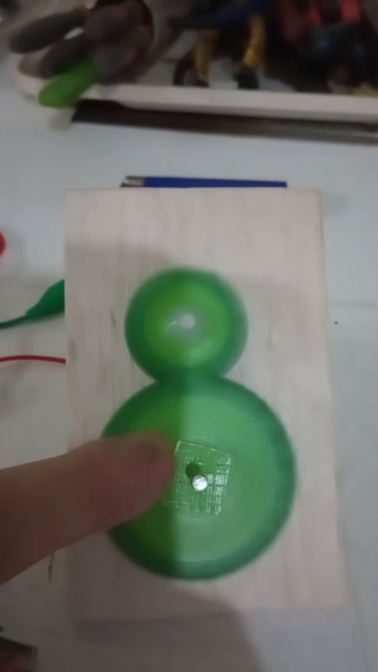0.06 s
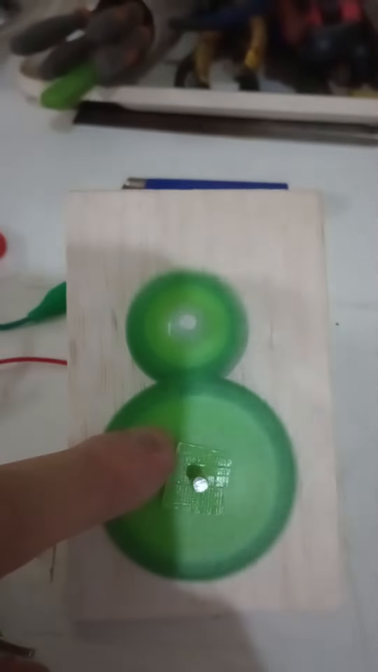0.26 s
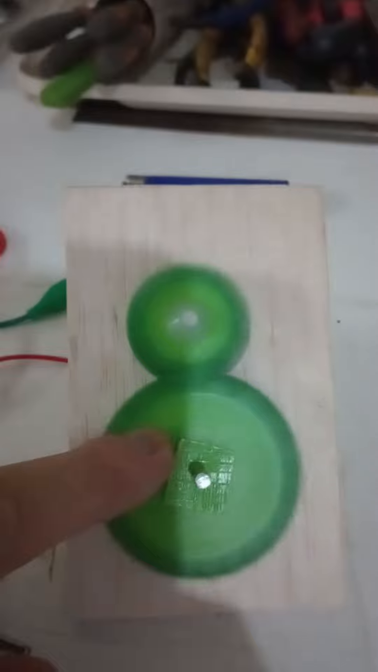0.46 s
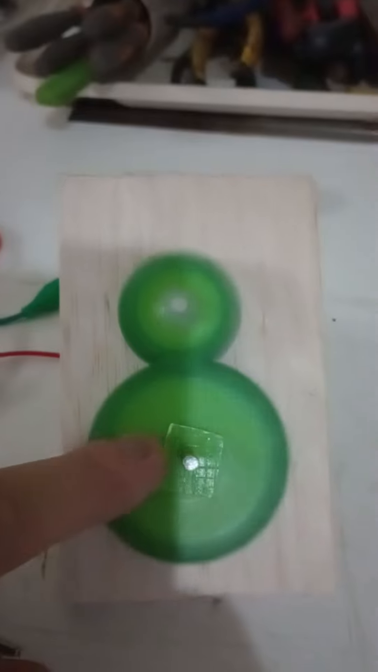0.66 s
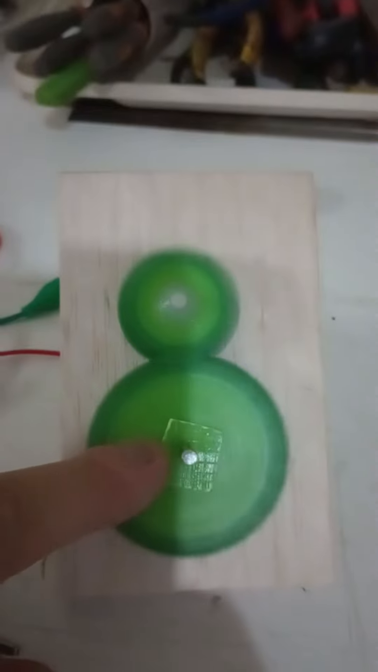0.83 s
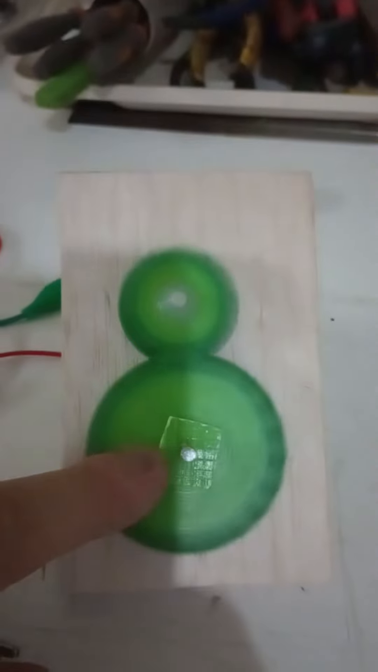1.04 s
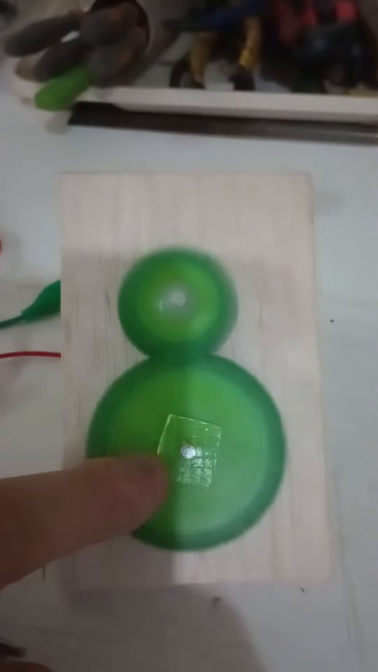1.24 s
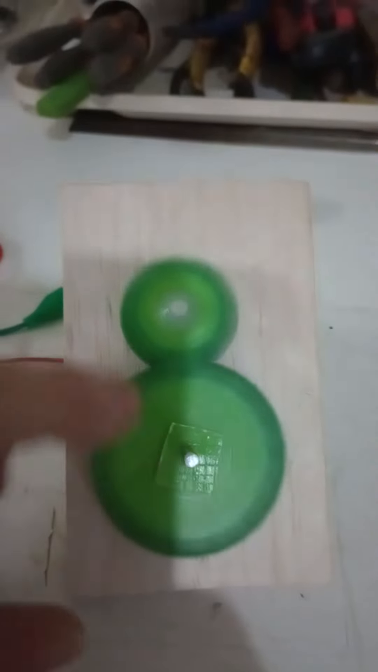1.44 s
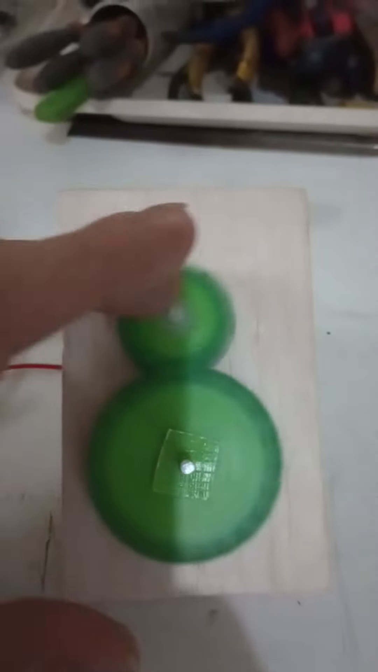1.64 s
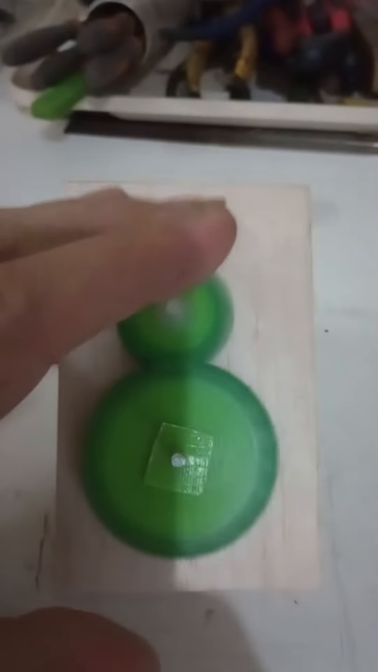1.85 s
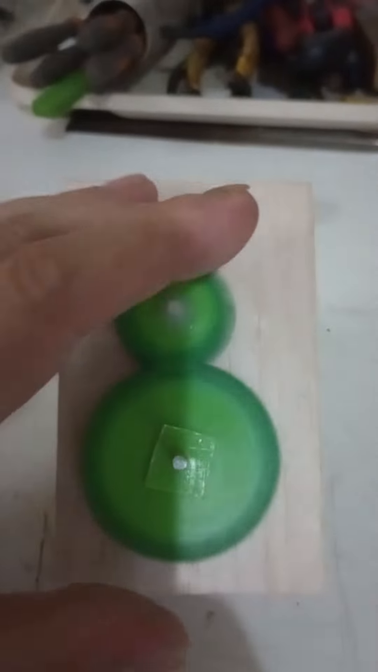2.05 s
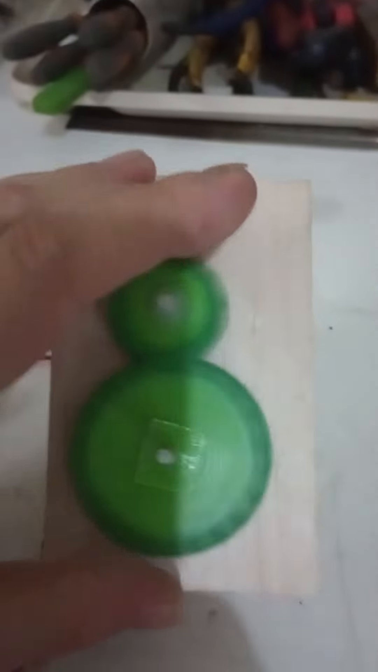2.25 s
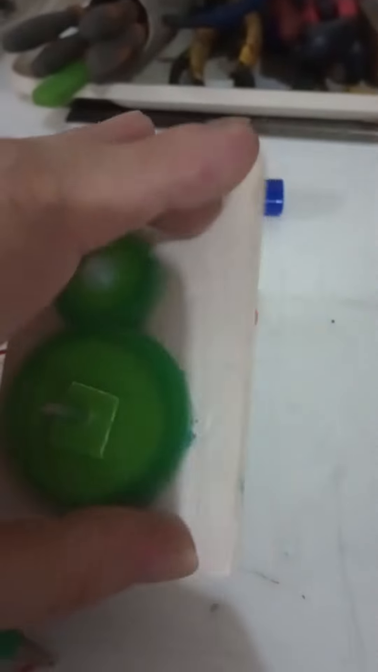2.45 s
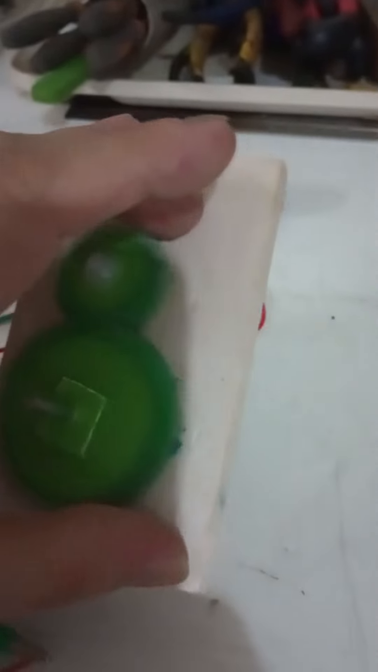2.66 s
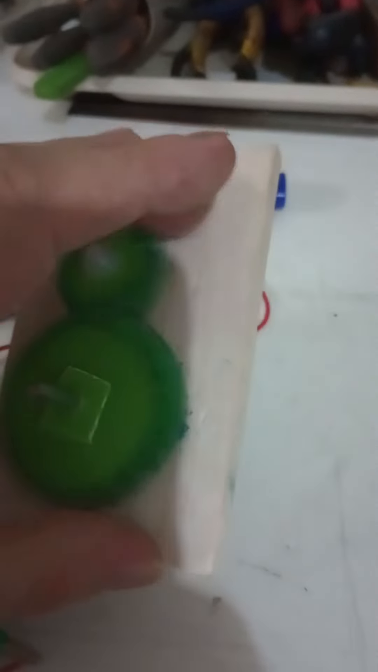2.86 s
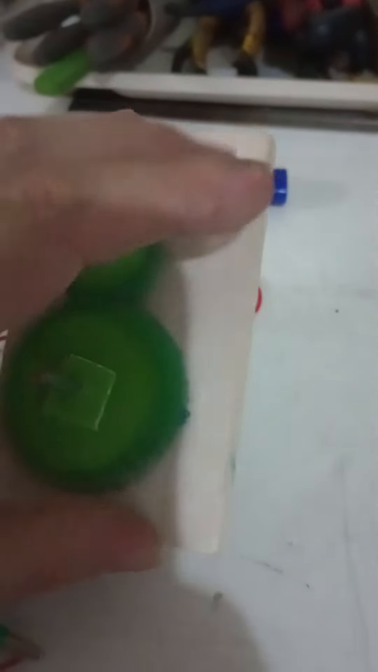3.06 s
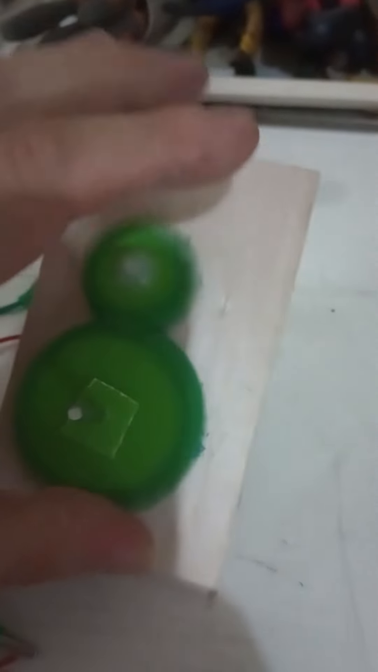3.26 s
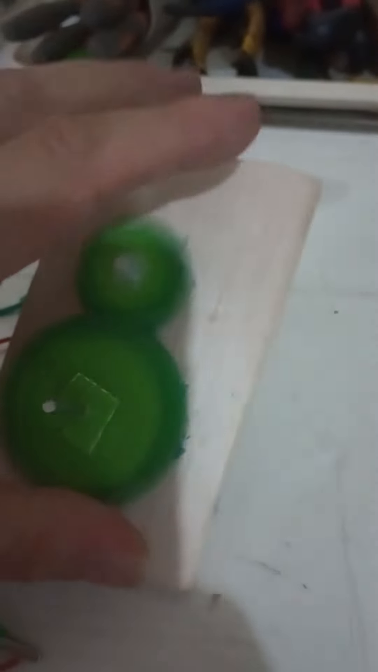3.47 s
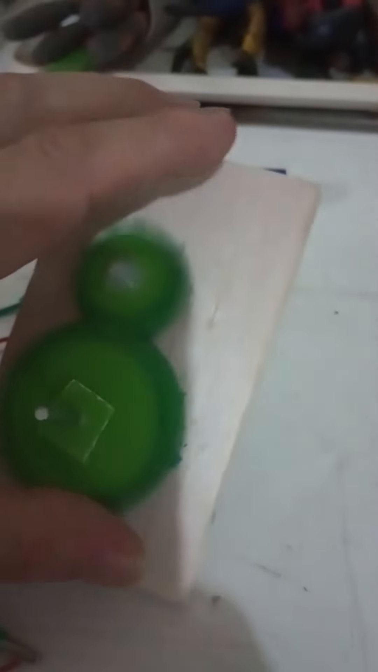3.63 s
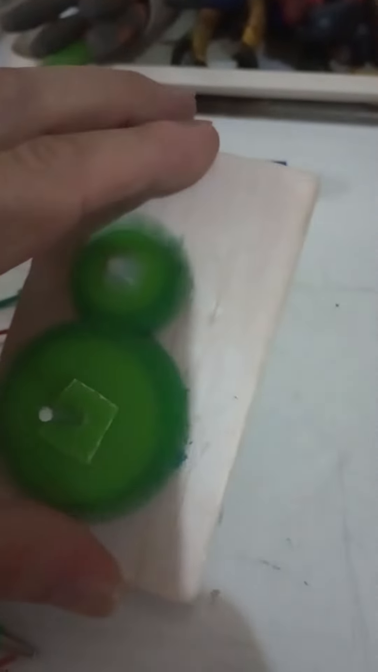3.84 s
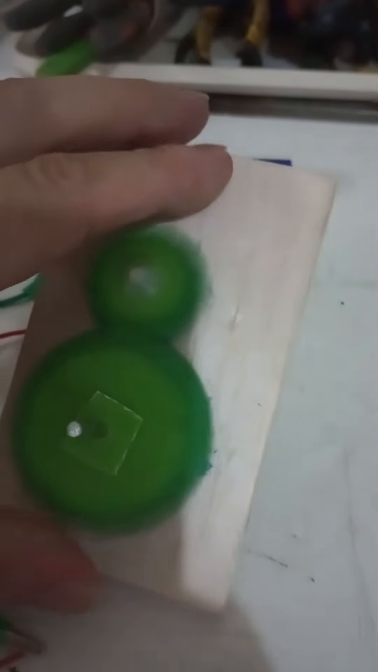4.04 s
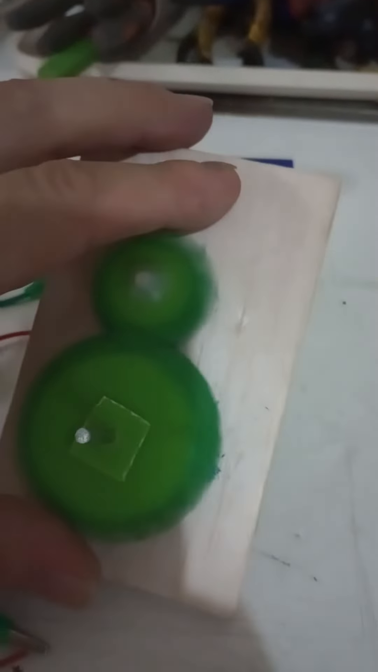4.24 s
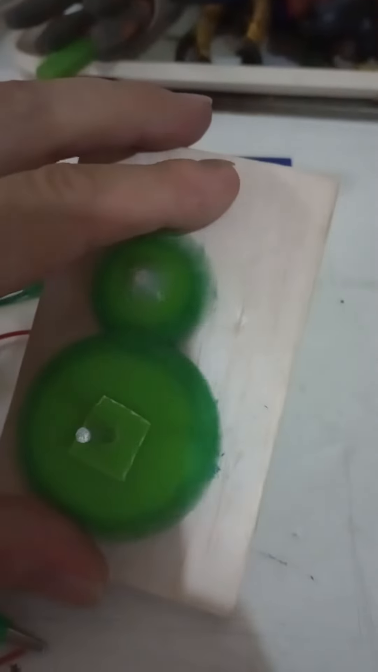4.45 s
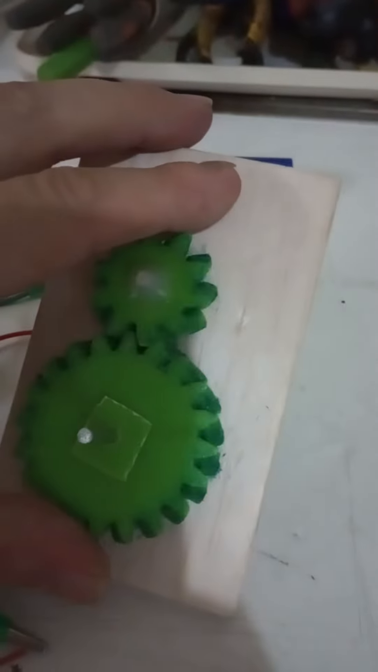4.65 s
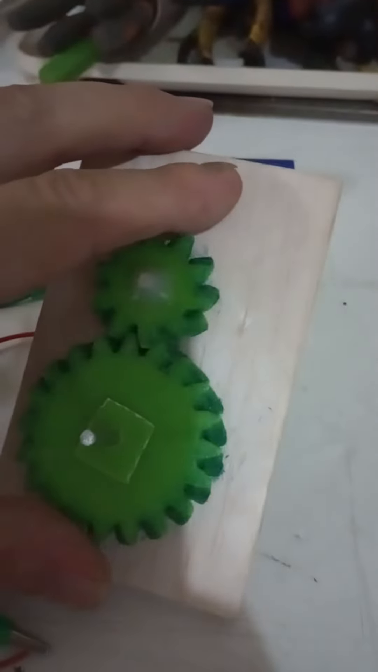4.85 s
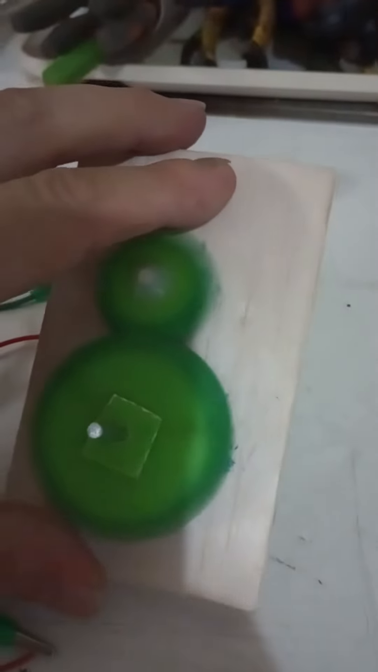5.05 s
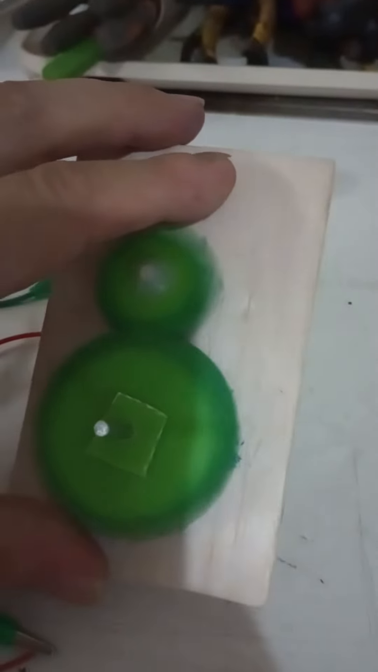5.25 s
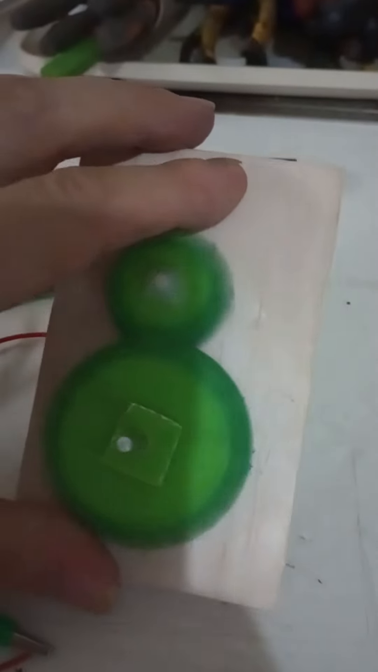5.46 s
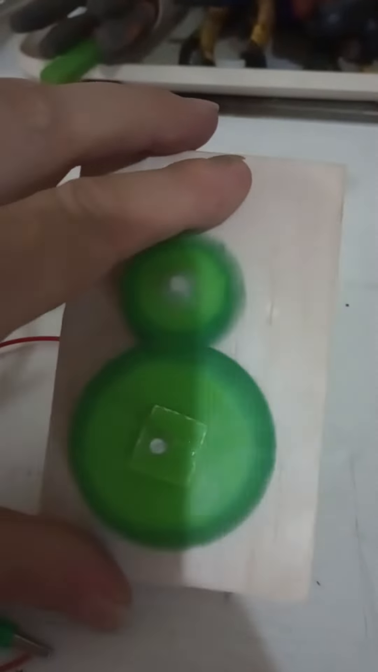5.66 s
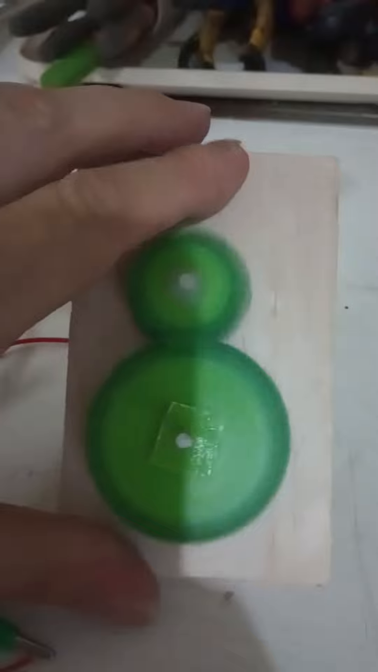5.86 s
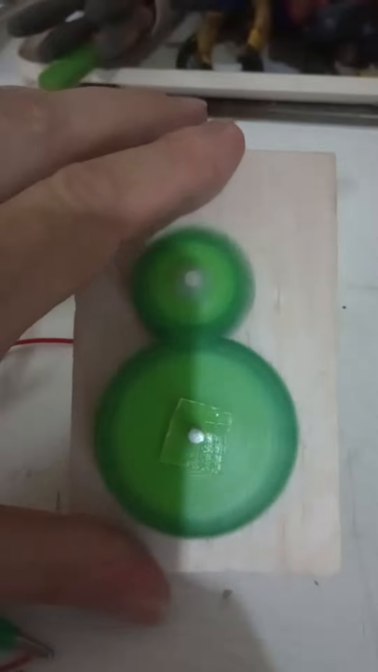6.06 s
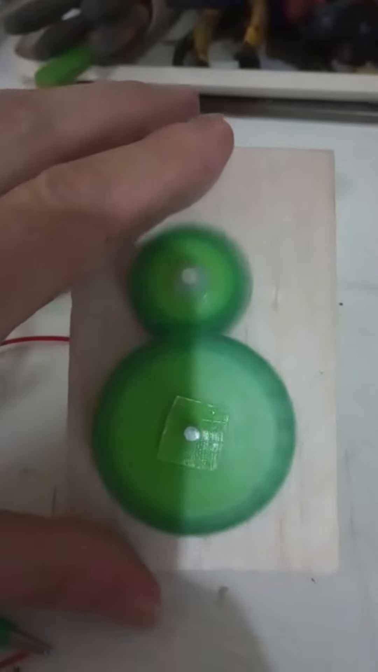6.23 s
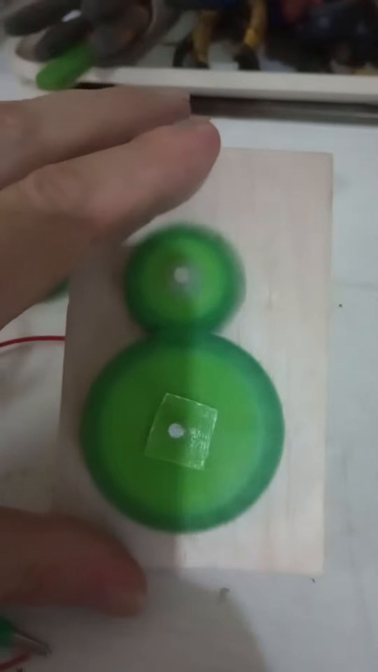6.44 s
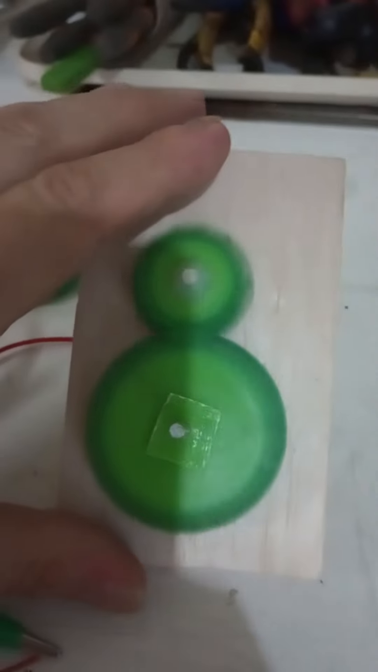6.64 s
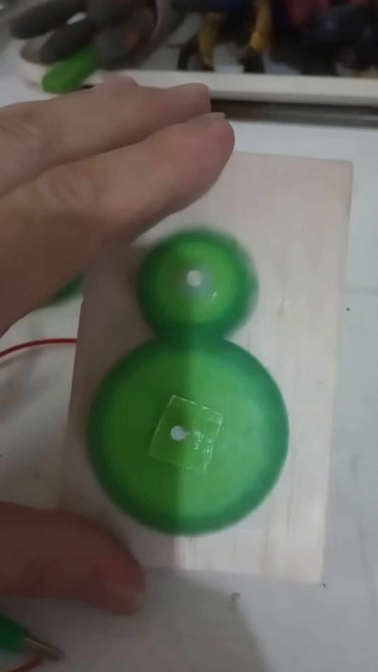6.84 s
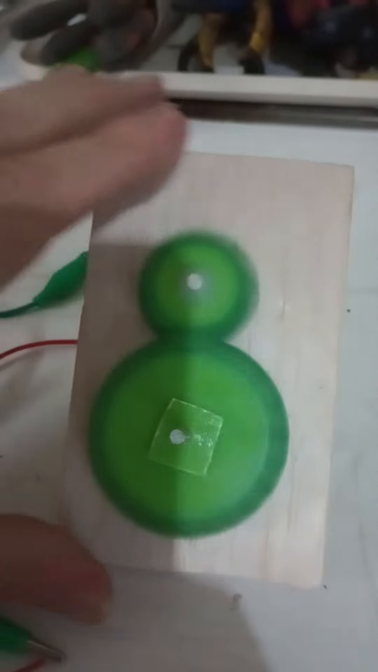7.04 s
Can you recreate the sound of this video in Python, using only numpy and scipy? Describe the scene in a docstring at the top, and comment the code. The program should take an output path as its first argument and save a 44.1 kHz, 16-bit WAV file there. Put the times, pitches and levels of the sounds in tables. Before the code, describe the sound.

Two loose plastic gears chatter fast on a small wooden block, rattling and buzzing harshly, stop briefly, then start up and rattle on.

```python
"""Two loose plastic gears, spun by a small battery motor on a wooden block over a bench, close to the microphone.
Tooth contacts and blows, as noise and clicks, ring the resonances of the block; their sharp edges are treble noise.
The power drops out once: the gears coast to a stop, stand still and start again.
Behind them lie a low rumble of the surroundings, shaped noise, and a wavering low hum, a gliding sine.
The microphone has two ports, left and right; the right one adds hiss."""
import sys
import numpy as np
from scipy import signal
from scipy.fft import rfft, irfft, next_fast_len
from scipy.io import wavfile
from scipy.ndimage import minimum_filter1d

SR = 44100
rng = np.random.default_rng(int(sys.argv[2]) if len(sys.argv) > 2 else 0)


def store_pcm(level_fs):
    """Save levels as 16-bit WAV."""
    pcm = np.round(np.clip(level_fs, -1, 1) * 32767).astype(np.int16)
    wavfile.write(sys.argv[1], SR, np.atleast_2d(pcm).T)


N = 313110   # samples

CHATTER_DB = 20   # raises the chatter that shakes the block
THUD_TO_HZ, RING_FROM_HZ, BRIGHT_FROM_HZ, TICK_FROM_HZ = 700, 1700, 2400, 4200   # which modes follow which colour

# Running gears, one list before the stop and one after:
# t/s, relative chatter level/dB, ring of the block against it level/dB, treble against it level/dB
RUNNING = [
    [(0.0, -27, 3.5, -4.5), (0.4, -26.5, 3, -5.5), (0.9, -28.5, 5.5, -5), (1.15, -30, 1, -9),
     (1.38, -27, 4.5, -3.5), (2.0, -26, 2.5, -6.5), (2.34, -28.5, 4.5, -4), (2.47, -33.5, 0.5, -4),
     (2.6, -30.5, -0.5, -2), (2.9, -34.5, 1, -1.5), (2.98, -37.5, -0.5, -6.5), (3.1, -30, -1.5, -3),
     (3.2, -27, 2, -4.5), (3.45, -26, 3, -4.5), (3.75, -31.5, 3.5, -5), (3.85, -28.5, 2.5, -3.5),
     (4.2, -29, 3, -3.5), (4.45, -37.5, 1.5, -9), (4.54, -39.5, -1, -20), (4.62, -57, -1, -12)],
    [(4.97, -50.5, 3, -4), (5.05, -30.5, 0.5, -4.5), (5.15, -31.5, 0, -2.5), (5.4, -30.5, -0.5, -3.5),
     (5.51, -34, 2, -4), (5.58, -28, 0.5, -6.5), (5.7, -27.5, 2, -4), (6.1, -28, 3, -4.5),
     (6.3, -25, 2, -6), (6.55, -27.5, 1.5, -5), (6.9, -26, 2, -5.5), (7.1, -23.5, 2.5, -6.5)],
]
# Pace of the mesh: t/s, f/Hz (teeth per second)
TOOTH_PACE = [(0, 168), (1.5, 157), (2.5, 196), (3, 143), (3.5, 188), (4.2, 153), (4.6, 55.6), (4.97, 53),
              (5.15, 148), (5.45, 152), (5.8, 177), (7.1, 169)]


def gears():
    """Meshing teeth chatter and strike; one play of contacts rings the block and gives off sharp edges."""
    running = slack()
    stop_s, restart_s = RUNNING[0][-1][0], RUNNING[1][0][0]
    running[int(stop_s * SR):int(restart_s * SR)] = 0   # the gears stand still
    chatter_db, ring_db, treble_db = in_time(RUNNING[0] + RUNNING[1])
    pace, = in_time(TOOTH_PACE)
    struck = knocks(running * from_db(chatter_db), treble_db, pace)
    grain = contacts(pace)
    wander = [from_db(MODE_FLUTTER_DB * drift(30.0)) for _ in range(5)]   # the point of contact moves over the teeth

    s, knock_db, knock_treble_db = struck
    at = (s * SR).astype(int)
    # each blow lands differently
    ring_chance_db, fizz_chance_db = KNOCK_COLOUR_SPREAD_DB * np.clip(rng.standard_normal((2, len(s))), -2, 2)
    knock_ring_db = KNOCK_RING_DB + ring_db[at] + ring_chance_db
    knock_fizz_db = KNOCK_FIZZ_DB + knock_treble_db + fizz_chance_db

    block = wooden_block(grain, wander, running, (chatter_db, ring_db, treble_db), pace, struck, knock_ring_db)
    return block + sharp_edges(grain, wander, running, chatter_db, treble_db, s, knock_db + knock_fizz_db)


KNOCK_RING_DB, KNOCK_BRIGHT_DB, KNOCK_FIZZ_DB, BLOW_THUD_DB = -4.5, -5, -22.5, -21   # colour of a blow
THUD_DB, RING_DB, BRIGHT_DB, TICK_DB = -8.5, -5, -5.5, -2.5   # colour of the chatter
THUD_FOLLOWS, TICK_FOLLOWS = 0.59, 1.52   # dB per dB of treble
FULL_PACE, THUD_DB_PER_HALVING = 176, 7   # teeth per s; slow teeth thud less
MODE_SPREAD_DB, MODE_FLUTTER_DB = 3.5, 1.7
BLOW_DB, BLOW_SPREAD_DB, REBOUND_DB = 17, -0.5, 9
RADIATES_FROM_HZ, CONTACT_CUT_HZ = 235, 6570

# Resonances of block and gears, rung at 65 Hz width or more:
# f/Hz, width f/Hz, left level/dB, right level/dB, right lag t/ms, left-right likeness 0-1
BLOCK_MODES = [(398, 73, -12.5, -15.5, 0.67, 0.3), (531, 105, -3, -15, 0.99, 0.85),
               (624.6, 58, 6, -1.5, 0.11, 0.95), (875, 134, -15.5, -12, 0.072, 0.8),
               (970.4, 119, -5.5, -8, 0.16, 1), (1070, 200, -15.5, -15, 0.035, 1),
               (1203, 300, -13, -15, 0.036, 1), (1656, 170, -17, -18, 0.089, 0.94),
               (1784, 56, -6.5, -6, 0.046, 0.84), (1915, 92, -4, -3, 0.054, 0.82),
               (1952, 85, -0.5, -0.5, 0.064, .95), (2174, 87, -2.5, -18.5, 0.099, 0),
               (2595, 27, 1, 1.5, 0.223, 0.46), (2852, 21, 0, 4, 0.175, 0.57),
               (3103, 126, -7.5, -6, 0.026, 0.9), (3625, 152, -4, -4.5, 0.094, 0.6),
               (3882, 177, -5, -6, 0.0645, 1), (4500, 250, -9, -15.5, 0.085, 0.3),
               (4885, 230, -9, -12.5, 0.097, 0.3), (5350, 460, -17.5, -30, 0, 0.25),
               (6686, 280, -14, -11.5, 0.035, 0.83)]


def wooden_block(grain, wander, running, curves_db, pace, struck, knock_ring_db):
    """Chatter, blows and rebounds drive every resonance of the block, each with chance of its own."""
    chatter_db, ring_db, treble_db = curves_db
    s, knock_db, knock_treble_db = struck
    out = np.zeros((2, N))
    for k, (hz, width, left_db, right_db, lag_ms, likeness) in enumerate(BLOCK_MODES):
        blow_colour_db, colour_db = 0, 0
        if hz < THUD_TO_HZ:
            blow_colour_db = BLOW_THUD_DB
            pace_db = THUD_DB_PER_HALVING * np.log2(pace / FULL_PACE)
            colour_db = THUD_DB + THUD_FOLLOWS * treble_db + pace_db
        elif RING_FROM_HZ < hz < BRIGHT_FROM_HZ:
            blow_colour_db = knock_ring_db
            colour_db = RING_DB + ring_db
        elif hz > BRIGHT_FROM_HZ:
            blow_colour_db = KNOCK_BRIGHT_DB + knock_treble_db
            colour_db = BRIGHT_DB + treble_db
            if hz > TICK_FROM_HZ:
                colour_db = TICK_DB + TICK_FOLLOWS * treble_db

        click, rebound = blows(s, knock_db + blow_colour_db)
        chatter = running * from_db(chatter_db + CHATTER_DB + colour_db)
        shaking = grain * wander[k % 5] * (chatter + from_db(REBOUND_DB) * rebound)
        shared, own = rng.standard_normal((2, N))
        sign = np.sign(shared)
        blow = click * sign * from_db(BLOW_DB + BLOW_SPREAD_DB * own)
        uneven = sign * from_db(MODE_SPREAD_DB * own) * shaking

        damped = max(width, 65)
        both = resonance(np.sqrt((1 + likeness) / 2) * uneven + blow, hz, damped)
        apart = resonance(np.sqrt((1 - likeness) / 2) * np.roll(own, 1) * shaking, hz, damped)
        out[0] += from_db(left_db) * (both + apart)
        out[1] += from_db(right_db) * late(both - apart, lag_ms)
    # a small block radiates no bass, and plastic teeth are too soft to ring high modes
    out = signal.sosfilt(signal.butter(3, RADIATES_FROM_HZ, "high", fs=SR, output="sos"), out)
    return signal.sosfilt(signal.butter(6, CONTACT_CUT_HZ, fs=SR, output="sos"), out)


FIZZ_DB, BLOW_FIZZ_DB, FIZZ_FLICKER_DB = -15, -10.5, 3   # the treble flickers
FIZZ_FOLLOWS, FIZZ_FEELS_SLACK = 1.39, 1.8   # dB per dB of treble; power of the slack gain

# Colour of the sharp edges at the two ports: f/Hz, left level/dB, right level/dB
EDGE_COLOUR = [(7000, -22, 4.5), (8200, 3.5, 3), (11400, -1, 4.5), (14050, 3.5, 5), (16300, -1, 15)]


def sharp_edges(grain, wander, running, chatter_db, treble_db, s, fizz_blow_db):
    """The sharp edge of every contact: noise bursts too short to ring, unlike at the two ports."""
    rebound = blows(s, fizz_blow_db)[1]
    fizz_db = chatter_db + FIZZ_DB + FIZZ_FOLLOWS * treble_db + FIZZ_FLICKER_DB * drift(3.8)
    fizz = running ** FIZZ_FEELS_SLACK * from_db(fizz_db)
    strength = grain * (fizz + from_db(BLOW_FIZZ_DB) * rebound)
    out = np.zeros((2, N))
    for k, band in enumerate([(6800, 9500), (9500, 12500), (12500, 17000)]):   # Hz
        noise = strength * wander[k] * rng.standard_normal((2, N))
        edge = signal.sosfilt(signal.butter(2, band, "band", fs=SR, output="sos"), noise)
        out += [coloured(edge[0], EDGE_COLOUR, axis=1), coloured(edge[1], EDGE_COLOUR, axis=2)]
    return out


CONTACTS_PER_S, CONTACT_SPREAD_DB = 1300, 2.3
TOOTH_DB, TOOTH_JITTER, FLUTTER_DB = 3.2, 0.22, 0.8   # swing per tooth, timing spread in teeth, chance swing


def contacts(teeth_per_s):
    """Strength of the small contacts: random moments, uneven sizes, bunched as each tooth passes; rms 1."""
    sizes = from_db(CONTACT_SPREAD_DB * np.minimum(rng.exponential(1, N), 5))
    touching = sizes * (rng.random(N) < CONTACTS_PER_S / SR)
    teeth_passed = np.cumsum(teeth_per_s) / SR + TOOTH_JITTER * drift(37.3)
    tooth = np.cos(2 * np.pi * teeth_passed)
    steady_rub = 0.24
    return rms_one((touching + steady_rub) * from_db(TOOTH_DB * tooth + FLUTTER_DB * drift(110)))


SLACK_MS, TAKE_UP_DB, TAKE_UP_S = 13.4, 2.5, 0.031   # width of a dip; surge and its decay

# The mesh goes slack about once a turn: t/s, depth level/dB (zero or above: no dip)
SLACK_MOMENTS = [(0.092, -3), (0.208, -8.5), (0.324, -6), (0.44, -4), (0.552, 0), (0.674, -7), (0.807, -8),
                 (0.93, -7), (1.06, -3), (1.228, -3), (1.353, -6.5), (1.471, -2), (1.586, -4.5),
                 (1.7, -5.5), (1.823, -11), (1.94, -6), (2.06, 3), (2.174, -6.5), (2.302, -9), (2.43, -5),
                 (2.592, -9), (2.734, -7), (2.872, -9), (3.035, -11), (3.165, -5), (3.285, -7),
                 (3.405, -10.5), (3.524, -12), (3.66, 5), (3.809, -4), (3.926, -7), (4.046, -6),
                 (4.148, -0.5), (4.269, 11), (4.409, -1), (5.112, -9), (5.232, -6), (5.367, -7),
                 (5.53, -3.5), (5.664, -4), (5.773, -4.5), (5.882, -7), (5.985, -5), (6.095, -6),
                 (6.205, -8), (6.317, -9), (6.429, -9), (6.533, -5), (6.65, -2.5), (6.757, -3),
                 (6.862, -3.5), (6.979, -6), (7.09, -12)]


def slack():
    """Chatter gain: smooth dips as the teeth lose touch, each moment with a surge as they take up the play."""
    t = np.arange(N) / SR
    s, depth_db = np.transpose(SLACK_MOMENTS)
    nearest = np.searchsorted((s[1:] + s[:-1]) / 2, t)
    since = t - s[np.maximum(np.searchsorted(s, t) - 1, 0)]
    half_width_s = SLACK_MS / 2000
    dip_db = np.minimum(depth_db, 0)[nearest] * np.exp(-((t - s[nearest]) / half_width_s) ** 2)
    return from_db(dip_db + TAKE_UP_DB * np.exp(-np.abs(since) / TAKE_UP_S))


TIMED_DB = -11.5   # added to the level of every timed blow
LIGHT_DB, LIGHT_SPREAD_DB, KNOCK_COLOUR_SPREAD_DB = 3.5, 3.5, 3.5   # chance blows against the chatter
TEETH_PER_KNOCK, KNOCK_JITTER = 2.5, 0.25   # one chance blow every few teeth, off by a share of the spacing

# Timed tooth blows, from hard ones to some too faint to hear:
# t/s, relative level/dB, treble against the body level/dB
TIMED_BLOWS = [(0.014, 0.5, -6), (0.044, -31, -5), (0.096, -7, 2), (0.129, -1, -7), (0.153, 0, -4),
               (0.187, -25, -8), (0.215, 1, -2), (0.244, -3, -7), (0.285, 0.5, -10), (0.329, -1, -5),
               (0.355, -7, -3), (0.458, -1, -7), (0.473, -1, -1), (0.505, -15, 0), (0.56, -10, -7),
               (0.605, -23, -5), (0.69, -23, -5), (0.718, -6, -8), (0.817, -1, -11), (0.833, -2, -8),
               (0.939, -4, -5), (0.976, -1, -11), (1.006, -3.5, -5), (1.075, -11, -6), (1.152, -11, -1),
               (1.269, -6.5, -3), (1.361, -7, -5), (1.386, -12, -10), (1.401, -10, -5), (1.416, -7, -5),
               (1.477, -4, -10), (1.507, -10, -5), (1.55, -9, 0), (1.595, -4, -5), (1.618, 0, 0),
               (1.68, -7, -8), (1.706, -2.5, -7), (1.743, -10, -3), (1.865, -15, -5), (1.907, -9, -10),
               (1.961, -1, -7), (2.007, -7, -3), (2.075, -0.5, -4), (2.144, -5, -2), (2.252, -8, -3),
               (2.308, -8, -5), (2.357, -11, -4), (2.649, -2.5, -5), (2.752, -8, 2), (2.812, -11, -1),
               (2.885, -6, -4), (3.044, -21, -12), (3.121, -30, -7), (3.176, -7, -5), (3.207, -11, -11),
               (3.253, -3.5, -7), (3.326, 2.5, -8), (3.353, -9, -5), (3.412, -3, -5), (3.569, -1.5, -1),
               (3.82, -7, -5), (3.962, -0.5, -8), (3.994, -9, -13), (4.061, -11, -5), (4.164, -3, -2),
               (4.178, -8, -3), (4.243, -4, -4), (4.371, -8, -8), (4.459, -18, 2), (4.504, -19, -5),
               (4.529, -30, -7), (4.982, -34, -9), (5.049, -14, -5), (5.124, -6, 1), (5.154, -15, -7),
               (5.182, -8, -1), (5.254, -15, -5), (5.328, -13, -2), (5.4, -8, -12), (5.462, -12, -5),
               (5.542, -7, -11), (5.575, -11, -5), (5.625, -5, 3), (5.669, -1, -2), (5.725, -15, 0),
               (5.801, -9, -5), (5.868, -8, -13), (5.992, -7, -8), (6.118, -9, -5), (6.214, -9, -1),
               (6.223, -2, 1), (6.268, -8, -7), (6.319, -11, -5), (6.436, -17, -9), (6.562, -8, -7),
               (6.658, -4, -3), (6.784, -0.5, -10), (6.9, 2, -4), (6.932, -1, -7), (6.963, -1, -5),
               (6.987, -5, -5), (7.039, -22, -8)]


def knocks(strength, treble_db, pace):
    """Time, level and treble of all tooth blows: the timed ones, and chance ones that follow pace and chatter."""
    timed_s, timed_db, timed_treble_db = np.transpose(TIMED_BLOWS)
    turn = np.cumsum(pace) / SR / TEETH_PER_KNOCK
    slip, size, shine = np.clip(rng.standard_normal((int(turn[-1]) - 1, 3)), -2, 2).T
    at = np.searchsorted(turn, np.arange(len(slip)) + 1 + KNOCK_JITTER * slip)
    weakest = minimum_filter1d(strength, size=SR // 100)[at]   # least chatter within 10 ms
    light_db = 20 * np.log10(weakest + 1e-9) + LIGHT_DB + LIGHT_SPREAD_DB * size
    light_treble_db = treble_db[at] + KNOCK_COLOUR_SPREAD_DB * shine
    all_s = np.r_[at / SR, timed_s]
    return all_s, np.r_[light_db, timed_db + TIMED_DB], np.r_[light_treble_db, timed_treble_db]


BLOW_SCATTER_MS, REBOUND_S = 1.0, 0.0028


def blows(s, level_db):
    """One click per blow, and the strength of the contacts that swell up to it and die away after it."""
    scatter = rng.normal(0, BLOW_SCATTER_MS / 1000, len(s))   # drawn anew for every mode
    clicks, swell = np.zeros((2, N))
    clicks[((s + scatter) * SR).astype(int)] = from_db(level_db)
    swell[((s - REBOUND_S) * SR).astype(int)] = from_db(level_db)
    fade = np.exp(-1 / (REBOUND_S * SR))
    rebound = np.e * (1 - fade) * signal.lfilter([1], [1, -2 * fade, fade ** 2], swell)
    return clicks, rebound


HUM_WAVER_DB = 1.5

# A low hum: t/s, f/Hz, rms level/dB before the waver
LOW_HUM = [(0, 85, -56), (.3, 89.4, -57), (1.2, 88, -57), (1.5, 88.8, -62), (2.4, 86, -64), (3, 85.3, -64),
           (3.2, 88, -75), (3.55, 96.3, -85), (3.72, 97.6, -53), (3.9, 97, -85), (6.5, 98, -73),
           (6.75, 97.5, -58), (7.1, 98, -64)]


def hum():
    """A sine that glides in pitch and level, wavering, the same at both ports."""
    hz, hum_db = in_time(LOW_HUM)
    amplitude = np.sqrt(2) * from_db(hum_db + HUM_WAVER_DB * drift(11.0))
    return amplitude * np.sin(2 * np.pi * np.cumsum(hz) / SR)


RUMBLE_DB, RUMBLE_LIKENESS, RUMBLE_FOLLOWS = -54, 0.78, 0.16   # level; left-right; dB per dB of chatter

# Colour of the rumble: f/Hz, relative level/dB
RUMBLE_COLOUR = [(30, -40), (60, -10), (85, 0), (120, 1), (130, -1.5), (139, 6.5), (150, -3.5), (300, -0.5),
                 (500, -17), (1500, -11), (4000, -36), (6000, -41)]


def rumble():
    """Low rumble of the surroundings: shaped noise, much alike at both ports."""
    mid, side = (rms_one(coloured(rng.standard_normal(N), RUMBLE_COLOUR)) for _ in range(2))
    alike, unlike = np.sqrt((1 + RUMBLE_LIKENESS) / 2), np.sqrt((1 - RUMBLE_LIKENESS) / 2)
    ports = alike * mid + unlike * side * [[1], [-1]]
    chatter_db = in_time(RUNNING[0] + RUNNING[1])[0]   # the running gears shake the bench a little
    return from_db(RUMBLE_DB + RUMBLE_FOLLOWS * (chatter_db - chatter_db.mean())) * ports


HISS_DB = -43

# Colour of the hiss of the right port: f/Hz, relative level/dB
HISS_COLOUR = [(80, -52), (150, -10.5), (400, -10), (2400, -12.5), (4000, -18.5), (7000, -23),
               (11000, -23.5), (15800, -16.5)]


def right_port_hiss():
    """Steady shaped noise of the right microphone port alone."""
    return from_db(HISS_DB) * rms_one(coloured(rng.standard_normal(N), HISS_COLOUR)) * [[0], [1]]


def from_db(db):
    """Gain of a level in dB."""
    return 10 ** (np.asarray(db) / 20)


def rms_one(x):
    """Scaled to rms 1."""
    return x / np.sqrt(np.mean(x ** 2) + 1e-20)


def in_time(rows):
    """Columns of a curve table, one value a sample."""
    s, *columns = np.transpose(rows)
    return [np.interp(np.arange(N) / SR, s, c) for c in columns]


def coloured(x, points, axis=1):
    """Shapes x by one dB column of a table over log frequency."""
    size, table = next_fast_len(N), np.array(points)
    hz = np.maximum(np.fft.rfftfreq(size, 1 / SR), 1)
    gain = from_db(np.interp(np.log(hz), np.log(table[:, 0]), table[:, axis]))
    return irfft(rfft(x, size) * gain, size)[:N]


def drift(rate):
    """Slow chance: noise twice through a one-pole low-pass at rate in Hz; spread 1."""
    r = np.exp(-2 * np.pi * rate / SR)
    settled = signal.lfilter([1], [1, -2 * r, r * r], rng.standard_normal(N + SR))[SR:]
    return rms_one(settled)


def resonance(x, hz, width):
    """Two-pole ring scaled so that white noise keeps a fixed density on its top."""
    r = np.exp(-np.pi * width / SR)
    poles = [1, -2 * r * np.cos(2 * np.pi * hz / SR), r * r]
    return signal.lfilter([(1 - r * r) / 2, 0, (r * r - 1) / 2], poles, x)


def late(x, ms):
    """x delayed by a fraction of a millisecond."""
    return np.interp(np.arange(N) - ms * SR / 1000, np.arange(N), x)


def scene():
    """Gears close by, over the hum and the rumble of the surroundings."""
    return gears() + hum() + rumble()


CUTOFF_HZ = 15950   # 60 dB down from here up


def record(dry):
    """The right port adds its hiss, peaks are rounded, the top is cut."""
    rounded = 0.92 * np.tanh((dry + right_port_hiss()) / 0.86)
    return signal.sosfilt(signal.cheby2(24, 60, CUTOFF_HZ, fs=SR, output="sos"), rounded)


dry = scene()
out = record(dry)
store_pcm(out)
```